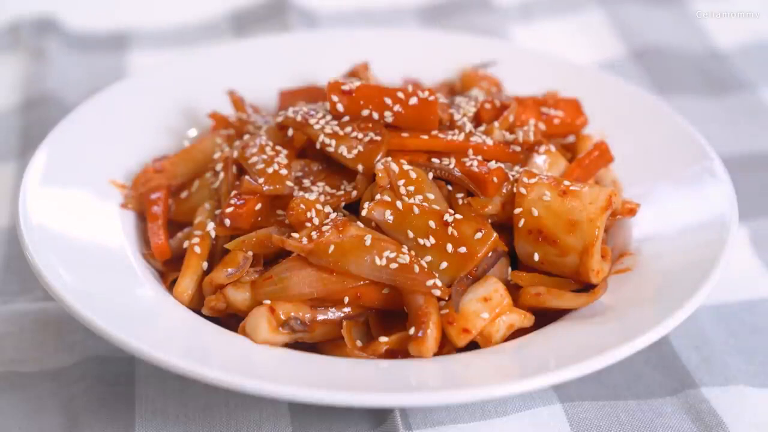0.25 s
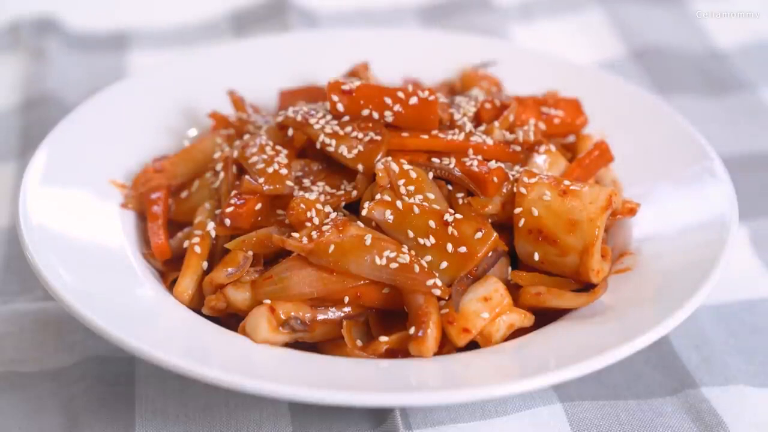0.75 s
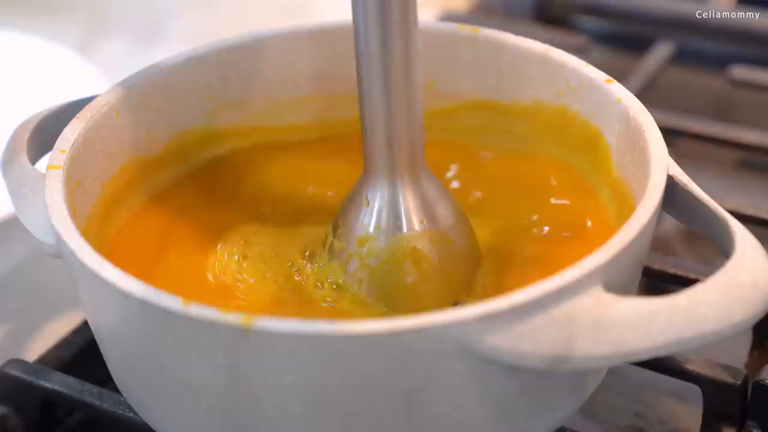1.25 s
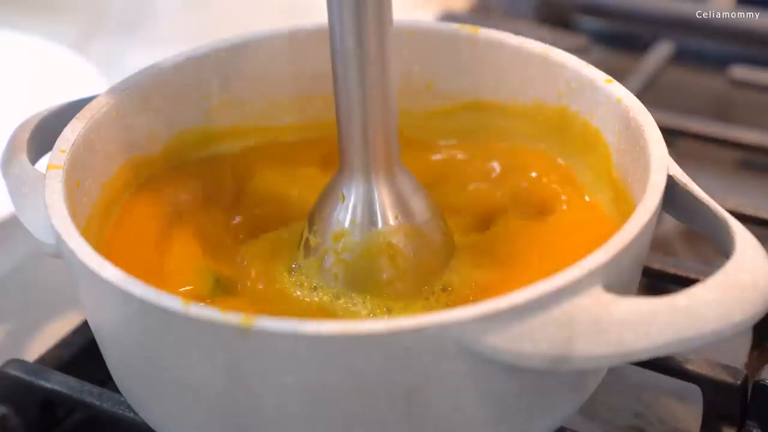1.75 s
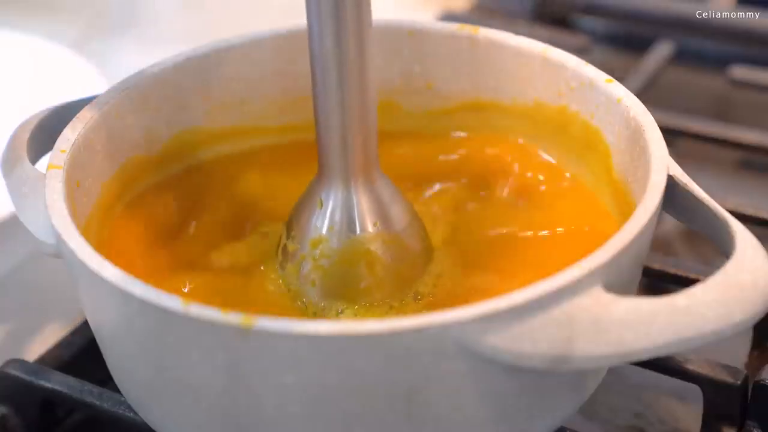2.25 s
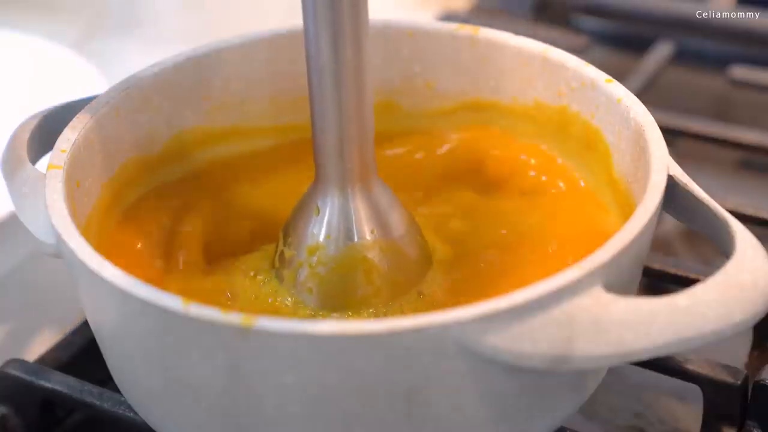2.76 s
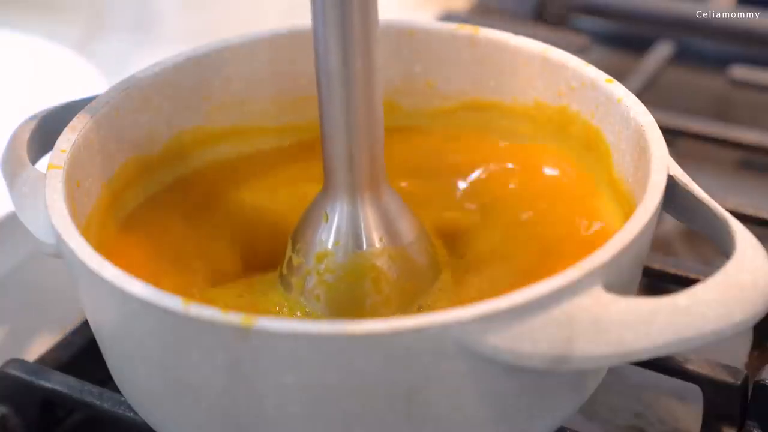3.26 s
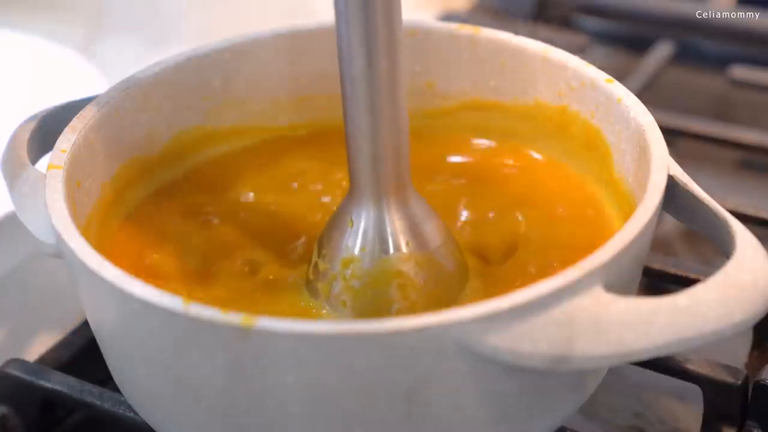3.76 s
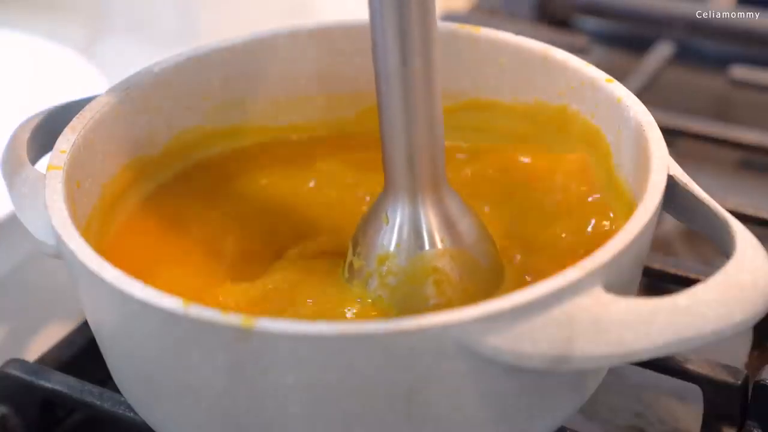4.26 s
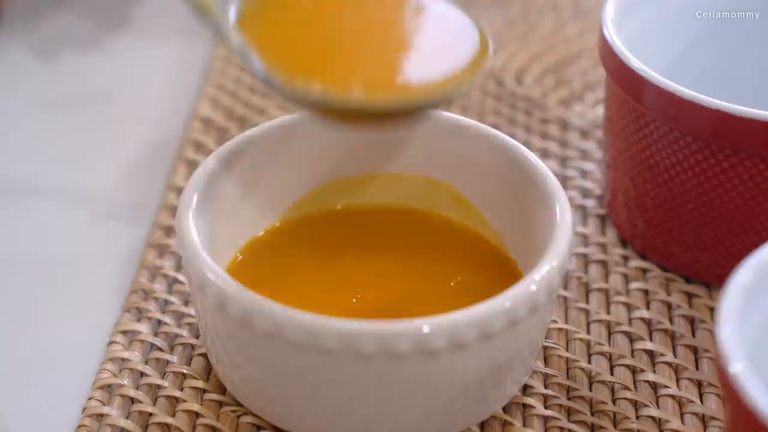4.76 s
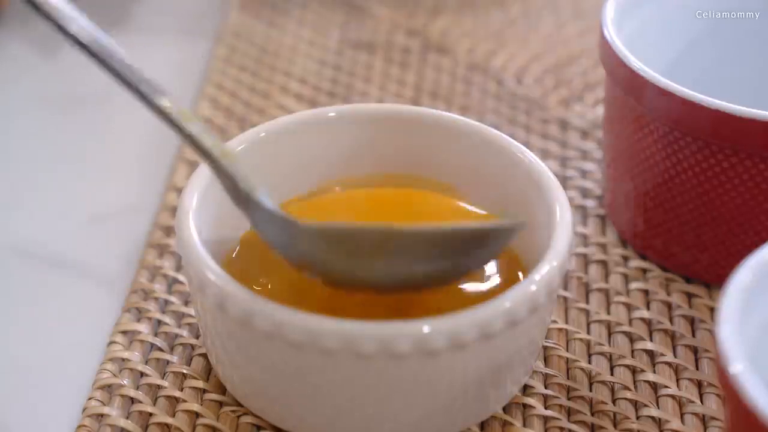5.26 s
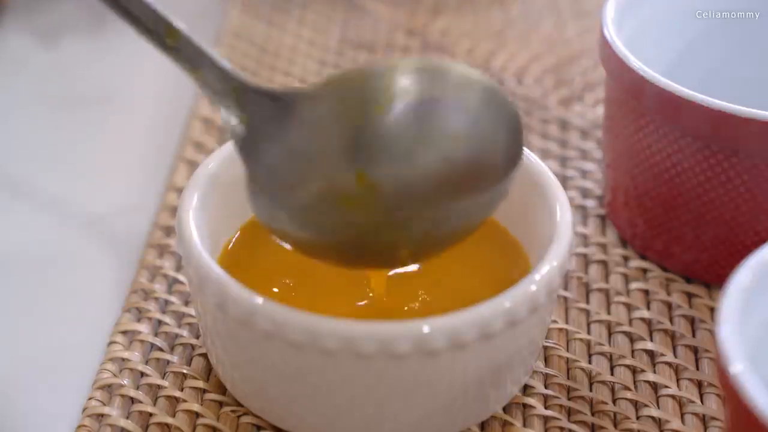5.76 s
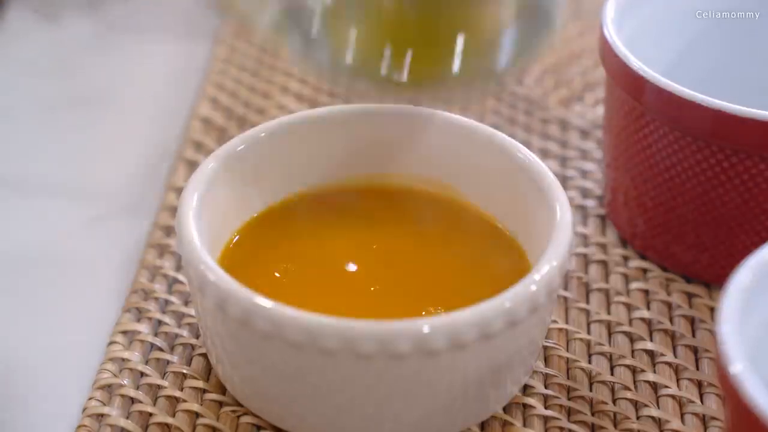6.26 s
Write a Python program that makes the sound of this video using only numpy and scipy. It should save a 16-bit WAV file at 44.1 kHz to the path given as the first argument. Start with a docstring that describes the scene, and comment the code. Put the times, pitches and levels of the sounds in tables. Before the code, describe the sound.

Near-silent kitchen, then a handheld blender abruptly whirs and gurgles through thick soup, cutting to soft fan rush as soup is ladled with wet plops.

```python
"""Stick blender in a soup pot

Place: a quiet kitchen, then abruptly a blender in thick soup, then abruptly a fan while soup is ladled out.
Blender: shaft hum and commutator whine are tones locked to the turns; brushes rasp as hiss and a repeated
worn track; air pockets burst as random clicks; a steel sleeve sings. Fan: coloured noise and motor tones.
Dollops are swells of tiny bursts, drips are short notes with spray. Stereo: near mono bass, wide treble.
"""
import sys
import numpy as np
from scipy import signal
from scipy.fft import rfft, irfft
from scipy.io import wavfile

SR = 44100
rng = np.random.default_rng(int(sys.argv[2]) if len(sys.argv) > 2 else 0)


def master(y):
    """Save y as 16-bit WAV."""
    cut = np.clip(np.atleast_2d(y).T, -1, 1)
    pcm = np.round(cut * 32767)  # scale
    wavfile.write(sys.argv[1], SR, pcm.astype(np.int16))


N = 287388
TIME = np.arange(N) / SR  # s
BINS = np.maximum(np.arange(N // 2 + 1) * SR / N, 1)  # Hz
SIDES = np.array([[1], [-1]])  # sign of the side signal in left and right

START_S, STOP_S = 1.347, 4.603  # blender on and off
CUTOFF_HZ = 15750

# Stereo pair, left against right: [pitch_hz, left_minus_right_db]
BALANCE = [(100, 0.5), (500, -1.1), (2000, -1.4), (8000, -3), (13000, -2)]
# Stereo width: [pitch_hz, side_minus_mid_db]
WIDTH = [(100, -32), (250, -34), (400, -18), (650, -15.5), (1000, -10), (2000, -5.5), (4000, -4),
         (8000, -2), (14000, -0.5)]

# Colour of the quiet kitchen: [pitch_hz, relative_db_per_hz]
QUIET_COLOUR = [(30, -32), (58, -15), (100, -16.5), (128, -7), (150, -15), (210, -4), (260, -6.5),
                (400, -8), (600, -8), (950, -8), (2500, -19.5), (5000, -20), (15500, -29.5)]
QUIET_DB = -56.9
# Thin electric whine in the quiet kitchen: one row of [pitch_hz, level_db]
THIN_WHINE = (4600, -82)
# Drips and small wet ticks: [start_s, level_db, pitch_hz, t60_s, splash_gain beside the bubble note]
DRIPS = [(0.781, -61, 5100, .03, 2.2), (2.298, -43, 10500, .07, 1.5), (5.128, -45, 2900, .04, 1.2),
         (5.383, -42, 6800, .1, .8), (5.455, -42, 2900, .035, 1.3), (5.565, -39.5, 4400, .022, 1.9),
         (6.065, -44, 7300, .04, 1.0), (6.29, -51, 2900, .18, 1.6), (6.477, -32, 1170, .09, .6)]

# Motor speed, sagging as thick soup loads the blade: [time_s, speed_turns_per_s]
SPEED = [(1.35, 95.5), (1.8, 95.5), (1.97, 95.25), (2.13, 95.55), (2.42, 94.9), (2.7, 94.65), (3.05, 94.7),
         (3.6, 95.35), (3.83, 96.1), (4.0, 96.0), (4.23, 95.2), (4.5, 95.7)]
USUAL_SPEED = 95.3  # turns per s
SPEED_JITTER = .11  # lumps jostle the blade: spread in turns per s
# Levels at the usual speed (dB), and their rise as the blade runs freer (dB per extra turn per s)
CHURN_DB, CHURN_RISE_DB = -27.0, 0.66
RASP_DB, RASP_RISE_DB = -35.0, 0.6
# Colour of the churning soup: [pitch_hz, relative_db_per_hz]
CHURN_COLOUR = [(30, -52), (90, -29), (140, -34), (190, -17.5), (240, -6), (400, -4), (590, -8),
                (760, -3.5), (1250, -3.5), (1900, -5), (3300, -8), (3800, -14), (7000, -21.5), (15000, -57)]
# Resonances of blade guard and pot: [pitch_hz, width_hz, boost_db]
GUARD = [(330, 120, -2.5), (857, 46, 6), (1184, 180, 6), (1552, 120, 7.5), (3284, 59, 5)]
# Colour of the gurgling air funnel over the blade: [pitch_hz, relative_db_per_hz]
FUNNEL_COLOUR = [(150, -60), (450, -19), (590, -27), (680, -3), (830, 1), (950, -16), (1400, -16),
                 (4000, -55)]
# Gurgle of the funnel, growing as it draws more air: [time_s, level_db]
GURGLE = [(1.35, -33.5), (2.3, -36), (3.5, -34.5), (4.05, -32.5), (4.4, -29), (4.6, -31)]
USUAL_GURGLE_DB = -33.5
# Colour of the brush rasp: [pitch_hz, relative_db_per_hz]
RASP_COLOUR = [(300, -17.5), (1500, 5), (3000, 6), (3800, -1), (5000, -1), (7000, -3.5), (8400, -5.5),
               (9300, -5.5), (11300, -12), (12400, -19), (14000, -9.5), (15500, -51)]
# Tones of the 24 commutator bars, with side tones from uneven wear: [multiple of the turn rate, level_db]
COMMUTATOR = [(24, -50), (46, -53), (49, -52), (50, -55), (53, -53.5), (54, -56), (59, -56), (62, -56),
              (67, -56), (72, -52), (96, -58.5), (97, -61), (107, -63), (119, -66), (120, -62), (144, -68)]
# The steel sleeve's own pitch, sinking as it works in the soup:
# one row of [start_pitch_hz, fall_hz_per_s, width_hz]
SLEEVE = (4549, 22, 50)
# The sleeve's whistle: [time_s, level_db]
WHISTLE = [(1.95, -43), (2.6, -40), (3.7, -39), (4.6, -40)]
# Tones of shaft, coupling and blade: [multiple of the turn rate, level_db,
# rise_db per extra turn per s, loss_db per dB of extra gurgle]
SHAFT = [(3, -40.3, 1.6, 1.1), (4, -36.3, 2.8, -.2), (5, -49, 1, 0), (6, -41.8, -1, .4), (7, -43.8, 1, 0),
         (9, -45, 1, 0), (10, -48, 1, 0), (12, -40.5, 1, .4), (14, -50.5, 1, 0), (26, -51, 1, 0)]

# Colour of the fan's air: [pitch_hz, relative_db_per_hz]
FAN_COLOUR = [(40, -38), (85, -26), (105, -12), (140, -15.5), (205, -4.5), (255, -11.5), (320, 1.5),
              (380, -2.5), (550, -6), (1200, -7), (2100, -12.5), (4000, -11.5), (6500, -9), (10000, -18),
              (15500, -24.5)]
FAN_DB = -40.5
# Tones of the fan motor, balanced among themselves: [pitch_hz, relative_db]
FAN_TONES = [(59.2, -67), (177.6, -59.5), (215.3, -58), (296.1, -55), (317.6, -54.5), (425.3, -58),
             (775.2, -59.5), (850.6, -62.5)]
# Dollops of soup sliding off the ladle: [fullest_s, level_db]
DOLLOPS = [(4.92, -44.5), (5.4, -47.5), (5.85, -46.5), (6.3, -56)]
DOLLOP_SWELL_S, DOLLOP_FADE_S = .07, .16  # time constants
# Colour of the pouring froth: [pitch_hz, relative_db_per_hz]
POUR_COLOUR = [(400, -29), (1500, -8), (2900, -10), (4200, 6), (7000, 3), (10000, -1), (15000, -20)]


def from_db(db):
    """Decibels to gain."""
    return 10 ** (np.asarray(db) / 20)


def rms_one(x):
    """Scale to unit power."""
    return x / np.sqrt(np.mean(x ** 2) + 1e-20)


def in_time(rows):
    """Join the points of a two-column curve into a control over time."""
    s, value = np.transpose(rows)
    return np.interp(TIME, s, value)


def at_hz(points, hz):
    """Read a table on a log-frequency axis."""
    f, value = np.transpose(points)
    return np.interp(np.log(hz), np.log(f), value)


def drift(rate):
    """Slow chance with spread 1: noise rolled off above the rate in Hz."""
    return rms_one(irfft(rfft(rng.standard_normal(N)) / (1 + (BINS / rate) ** 2), N))


def coloured(x, spectrum, peaks=()):
    """Give a signal a broad colour and a few resonances, at unit power."""
    db = at_hz(spectrum, BINS)
    for hz, width, peak_db in peaks:
        db = db + peak_db / (1 + (2 * (BINS - hz) / width) ** 2)
    return rms_one(irfft(rfft(x) * from_db(db), N))


def spread(pair):
    """Two unrelated signals become left and right: alike in the bass, apart in the treble."""
    mid, side = rfft(pair)
    return irfft(mid + from_db(at_hz(WIDTH, BINS)) * side * SIDES, N)


def tone(cycles, hz, flutter):
    """A partial whose strength and phase flutter, and which differs a little between left and right."""
    wobble = 1 + flutter * (drift(11) + 1j * drift(9.6))
    wave = np.exp(2j * np.pi * (cycles + rng.random())) * wobble
    side = from_db(at_hz(WIDTH, hz)) * rng.choice([-1, 1])
    return rms_one(wave.real) + side * rms_one(wave.imag) * SIDES


def from_right(pair, late_samples=4):
    """Sound from the right reaches the left channel a few samples late."""
    return np.array([np.roll(pair[0], late_samples), pair[1]])


def air(spectrum, peaks=()):
    """Steady, even rush of air: coloured stereo noise."""
    return coloured(spread(rng.standard_normal((2, N))), spectrum, peaks)


def quiet_kitchen():
    """Faint air with two low resonances, and a thin electric whine."""
    hz, db = THIN_WHINE
    rush = from_db(QUIET_DB) * air(QUIET_COLOUR, peaks=[(210, 23, 5.2), (325, 50, 5.8)])
    return rush + from_db(db) * tone(hz * TIME, hz, flutter=.15)


def drips(rise):
    """Each drip is a short bubble note, rising in pitch, with a splash of band-limited noise round it."""
    out = np.zeros(N)
    for s, db, hz, t60, splash in DRIPS:
        age = np.clip(TIME - s, 0, .3)
        edges = [hz * .8, min(hz * 1.25, .45 * SR)]
        band = signal.butter(3, edges, "band", fs=SR, output="sos")
        spray = rms_one(signal.sosfilt(band, rng.standard_normal(N)))
        bubble = np.sin(2 * np.pi * hz * age * (1 + rise * age))
        onset = 1 - np.exp(-age * hz / 4)
        out += from_db(db - 60 * age / t60) * onset * (bubble + splash * spray)
    return out


def churn(turns, per_s, size_db, beat_db, gulp_db, wash_db):
    """Air pockets collapse in bursts as the blade sweeps by, over a wash of sheared soup."""
    sweep = np.cos(2 * np.pi * turns + 0.48 * drift(13))
    force = from_db(beat_db * sweep + gulp_db * drift(13))
    born = rng.random((2, N)) < per_s / SR
    sizes = from_db(size_db * np.minimum(rng.exponential(1, (2, N)), 4))
    signed_sizes = sizes * rng.choice([-1, 1], (2, N))
    wash = from_db(wash_db) * rng.standard_normal((2, N))
    return spread((rms_one(born * signed_sizes) + wash) * force)


def brushes(turns, repeat_db, size=320):
    """The brushes ride the same worn track on every turn; sparks and cooling air add fresh hiss."""
    track = signal.resample(rng.standard_normal((2, size)), 16 * size, axis=1)
    angle = np.linspace(0, 1, track.shape[1], endpoint=False)
    worn = np.array([np.interp(turns, angle, side, period=1) for side in track])
    jolts = rms_one(np.gradient(worn, axis=1))  # the slope of the track shakes the brush: a bright buzz
    hiss = rng.standard_normal((2, N))
    return coloured(spread(hiss + from_db(repeat_db) * jolts), RASP_COLOUR)


def commutator(turns, ripple, flutter):
    """The bars whine; the current swells twice in each mains cycle."""
    current = 1 + ripple * np.cos(2 * np.pi * 120 * TIME)
    return current * sum(from_db(db) * tone(k * turns, k * USUAL_SPEED, flutter) for k, db in COMMUTATOR)


def whistle(turns, speed, flutter, side_db):
    """The sleeve sings on two commutator tones, mostly whichever lies nearer its own pitch."""
    start_hz, fall_hz_per_s, width = SLEEVE
    hz = start_hz - fall_hz_per_s * (TIME - START_S)
    orders = np.array([[47], [48]])  # multiples of the turn rate
    answer = 1 / (1 + 2j * (orders * speed - hz) / width)
    wave = np.sum(answer * np.exp(2j * np.pi * orders * turns), axis=0)
    wave = wave / np.linalg.norm(answer, axis=0)  # resonance sets the mix of the two, not the level
    wave = wave * (1 + flutter * (drift(25) + 1j * drift(25)))
    return rms_one(wave.real) + from_db(side_db) * rms_one(wave.imag) * SIDES


def shaft(turns, extra_speed, extra_gurgle_db, flutter, wander_db):
    """Unbalance and play in the drive hum at multiples of the turn rate, shifting with speed and drawn air."""
    hum = 0
    for k, db, rise, loss in SHAFT:
        level_db = db + rise * extra_speed - loss * extra_gurgle_db + wander_db * drift(2.7)
        hum = hum + from_db(level_db) * tone(k * turns, k * USUAL_SPEED, k * flutter)  # higher ones flutter more
    return hum


def blender():
    """All parts turn with one shaft; soup is thrown round the guard and gurgles in the funnel."""
    speed = in_time(SPEED) + SPEED_JITTER * drift(6)
    turns, extra_speed = np.cumsum(speed) / SR, speed - USUAL_SPEED
    gurgle_db = in_time(GURGLE)
    small_pockets = churn(turns, per_s=3000, size_db=2.8, beat_db=1.4, gulp_db=1.0, wash_db=-3)
    large_pockets = churn(turns, per_s=900, size_db=2.0, beat_db=1.2, gulp_db=1.0, wash_db=-1)
    soup = from_db(CHURN_DB + CHURN_RISE_DB * extra_speed) * coloured(small_pockets, CHURN_COLOUR, GUARD)
    gurgle = from_db(gurgle_db) * coloured(large_pockets, FUNNEL_COLOUR)
    rasp = from_db(RASP_DB + RASP_RISE_DB * extra_speed) * brushes(turns, repeat_db=-4.5)
    whine = commutator(turns, ripple=.38, flutter=.3)
    sleeve = from_db(in_time(WHISTLE)) * whistle(turns, speed, flutter=.22, side_db=-11)
    hum = shaft(turns, extra_speed, gurgle_db - USUAL_GURGLE_DB, flutter=0.021, wander_db=0.84)
    return soup + gurgle + rasp + whine + sleeve + hum


def fan(hum_db):
    """Rushing air with the hum of its motor, a set of steady pitches with a slight flutter."""
    hum = sum(from_db(db) * tone(hz * TIME, hz, flutter=0.12) for hz, db in FAN_TONES)
    return from_db(FAN_DB) * air(FAN_COLOUR) + from_db(hum_db) * hum


def pour(per_s, size_db):
    """Tiny bubbles in the froth burst as each dollop slides into the bowl: a quick swell, a slower fade."""
    flow = 0
    for s, db in DOLLOPS:
        distance = np.maximum((s - TIME) / DOLLOP_SWELL_S, (TIME - s) / DOLLOP_FADE_S)
        flow = flow + from_db(db) * np.exp(-distance)
    bursts = (rng.random((2, N)) < per_s / SR) * rng.standard_normal((2, N))
    froth = spread(bursts * from_db(size_db * drift(40)))
    return flow * coloured(froth, POUR_COLOUR)


def scene():
    """Quiet kitchen, blender and serving follow each other abruptly; the treble leans to the right."""
    started = np.clip((TIME - START_S) / 0.0013, 0, 1)
    stopped = np.clip((TIME - STOP_S) / 0.00073, 0, 1)
    serving = fan(hum_db=-1.0) + pour(per_s=2500, size_db=3.5)
    room = from_right((1 - started) * quiet_kitchen() + stopped * serving)
    mix = room + started * (1 - stopped) * blender() + drips(rise=1.0)
    return irfft(rfft(mix) * from_db(SIDES * at_hz(BALANCE, BINS) / 2), N)


def record(dry):
    """The top is cut steeply."""
    return signal.sosfilt(signal.ellip(10, .1, 80, CUTOFF_HZ, fs=SR, output="sos"), dry)


dry = scene()
out = record(dry)
master(out)
```